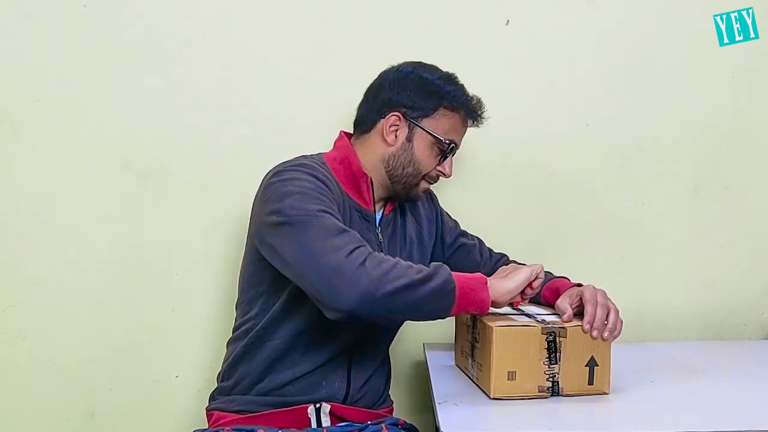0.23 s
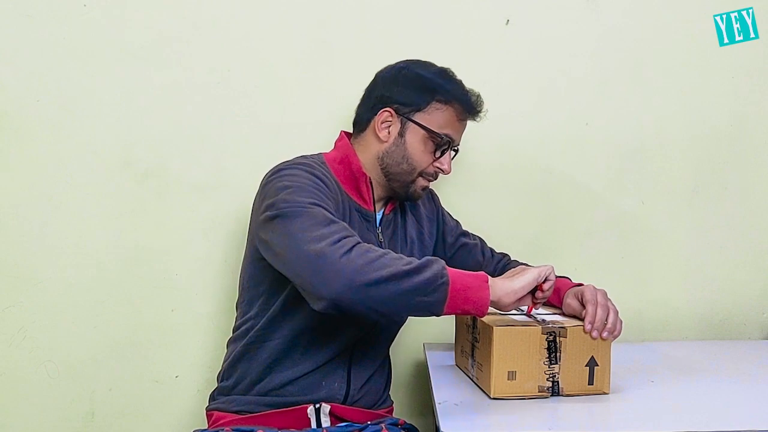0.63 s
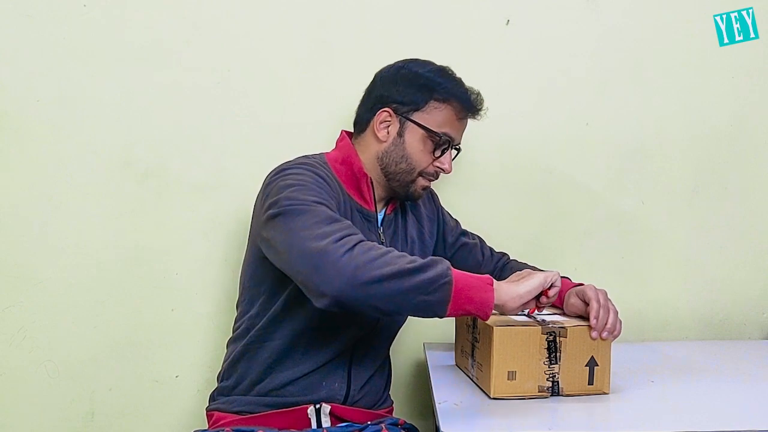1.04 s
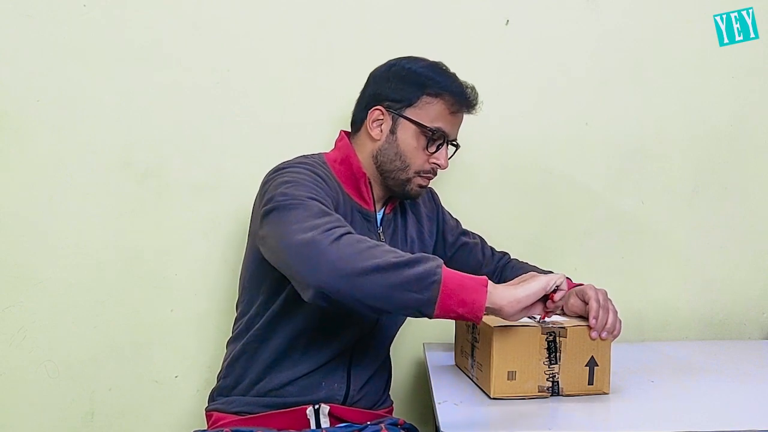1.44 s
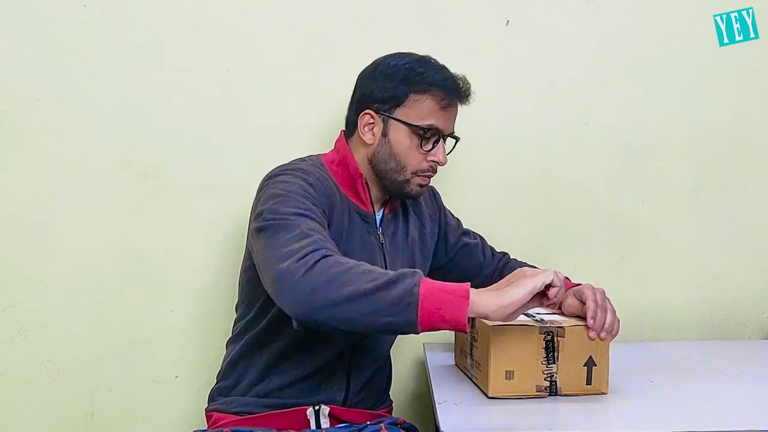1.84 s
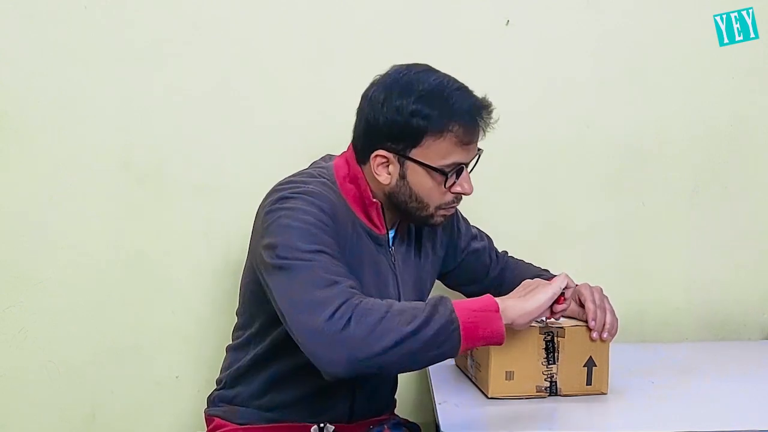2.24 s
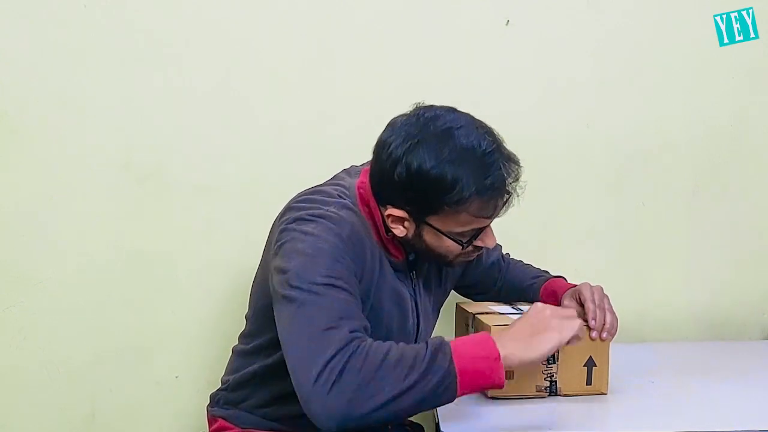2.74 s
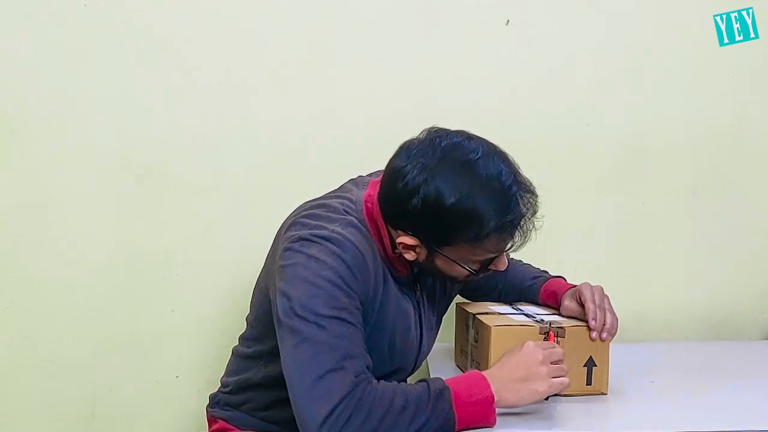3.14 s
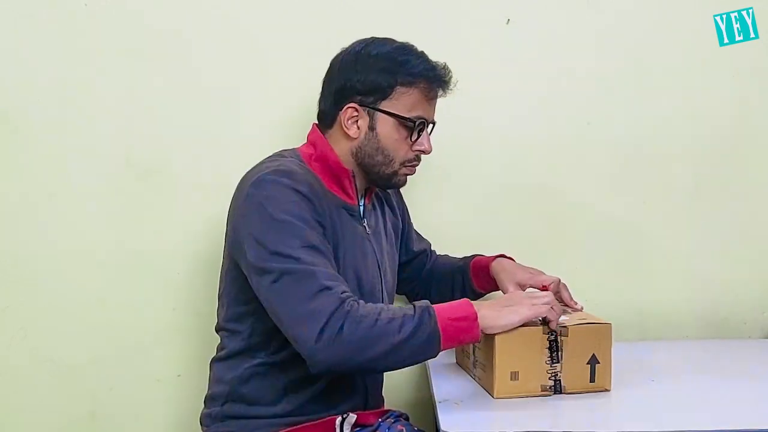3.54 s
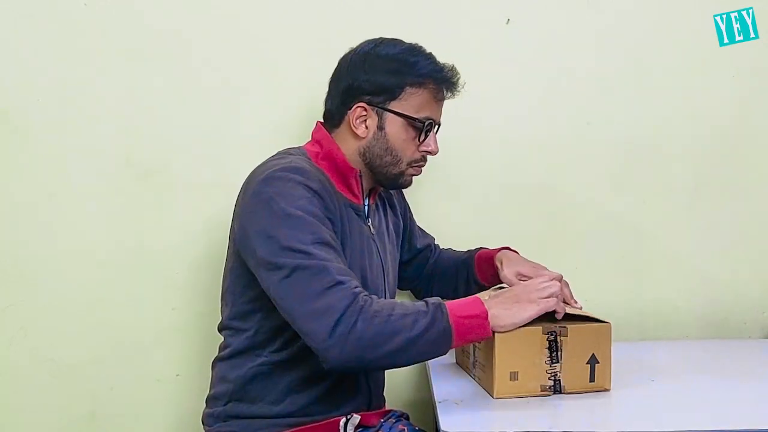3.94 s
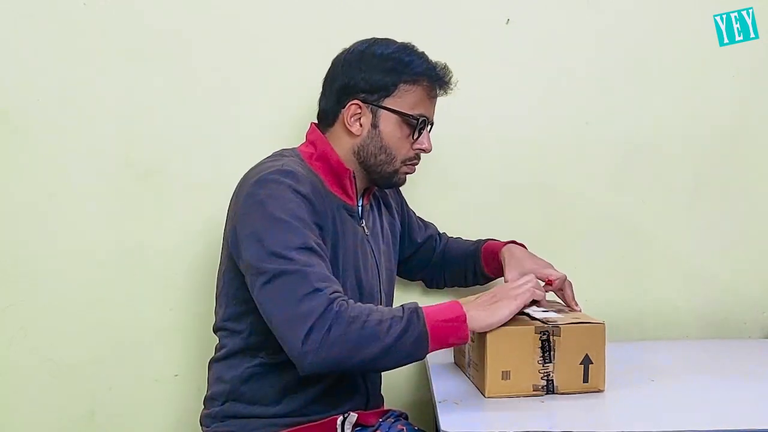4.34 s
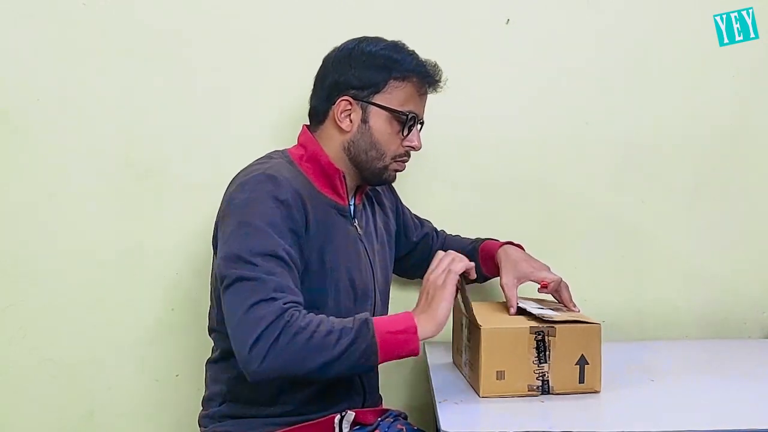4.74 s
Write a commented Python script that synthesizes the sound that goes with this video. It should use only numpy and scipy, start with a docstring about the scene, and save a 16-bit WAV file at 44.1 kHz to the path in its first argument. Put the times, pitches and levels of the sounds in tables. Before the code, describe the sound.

A knife slits packing tape on a cardboard box in gritty, hollow strokes, then hands tear the flaps loose with a booming rip.

```python
"""In a small bare room, a knife slits the tape on a cardboard box in a few strokes, then hands rip the flaps free.
Blade and tape stick and slip in dense tiny tears: random clicks ring the box (boom), the board (rasp)
and the tape film (fizz). Bigger catches are short noise bursts that snap and thump the box.
The steel rings faintly, the knife ticks once and the box shifts with soft low pushes.
Near surfaces and the room answer over a low room tone; one microphone."""
import sys
import numpy as np
from scipy import signal
from scipy.fft import rfft, irfft
from scipy.io import wavfile
from scipy.ndimage import uniform_filter1d

SR = 44100
rng = np.random.default_rng(int(sys.argv[2]) if len(sys.argv) > 2 else 0)


def dump(signal):
    """Clip the signal to [-1, 1] and save it as 16-bit WAV at the path in sys.argv[1]."""
    limited = np.clip(np.atleast_2d(signal).T, -1, 1)
    pcm = np.round(limited * 32767).astype(np.int16)
    wavfile.write(sys.argv[1], SR, pcm)


N = 220147
TIME = np.arange(N) / SR
EDGE_HZ = 15800  # upper band limit of the microphone


def amp(db):
    """Turns decibels into gain."""
    return 10 ** (np.asarray(db) / 20)


def evened(x):
    """Scales a sound to rms 1."""
    return x / np.sqrt(np.mean(x ** 2) + 1e-20)


def smoothed_twice(x, samples):
    """Takes a moving average, twice."""
    return uniform_filter1d(uniform_filter1d(x, samples), samples)


def steadied(x, samples):
    """Holds the rms near 1 over stretches of this many samples; finer grain stays."""
    power = smoothed_twice(x ** 2, samples)
    return x / np.sqrt(abs(power) + 1e-20)


def read(points, hz):
    """Reads a table between its points, on a log-frequency axis."""
    f, value = np.transpose(points)
    return np.interp(np.log(hz + 1), np.log(f + 1), value)


def add(mix, start_s, sound):
    """Mixes a sound in from a start time."""
    part = mix[max(round(start_s * SR), 0):][:len(sound)]
    part += sound[:len(part)]


def decay(t, t60):
    """Dies away by 60 dB in t60 seconds."""
    return np.exp(-np.log(1000) * t / t60)


def causal(gain, size=2048):
    """Turns a gain curve into a minimum-phase impulse response of unit energy."""
    cepstrum = irfft(np.log(np.maximum(gain / gain.max(), 1e-5)))
    # folding the cepstrum forward puts the energy as early as possible
    cepstrum[1:size] *= 2
    cepstrum[size + 1:] = 0
    taps = irfft(np.exp(rfft(cepstrum)))[:size]
    return taps / np.linalg.norm(taps)


def ring(modes, samples=12000):
    """Sums dying sines; neighbouring modes swing in opposite directions."""
    t = np.arange(samples) / SR
    total = np.zeros(samples)
    for k, (hz, db, t60) in enumerate(modes):
        total += (-1) ** k * amp(db) * decay(t, t60) * np.sin(2 * np.pi * hz * t)
    return total


# pushes of the knife, then pulls of the hands; levels before the trims in friction():
# start t/s, rise t/s, hold t/s, release t/s, box boom level/dB, board rasp level/dB, tape fizz level/dB
STROKES = [(-.05, 0.052, 0.16, 0.0333, -65, -69, -67.5), (0.127, 0.0329, .025, 0.1577, -29, -33, -43.5),
           (0.139, 0.2301, .06, .19, -26.5, -32.5, -41), (.42, 0.1186, 0.0541, 0.183, -24.5, -31, -38),
           (0.588, 0.051, .02, 0.097, -29.5, -52, -57.5), (0.848, 0.0743, 0.0192, 0.0864, -33.5, -43, -51),
           (.9, 0.075, 0.0198, .4, -58.5, -71, -89.5), (1.149, 0.1786, .04, 0.222, -23.5, -36.5, -42),
           (1.4, 0.0732, 0.3375, 0.0914, -34.5, -47.5, -50.5),
           (1.779, 0.0584, 0.0092, 0.1326, -22, -46.5, -42), (1.799, 0.069, .02, 0.2024, -29.5, -38, -33),
           (1.956, 0.068, 0.0255, 0.071, -67, -50.5, -53.5), (2.3, .028, 0.038, 0.173, -38.5, -49.5, -54.5),
           (2.412, 0.02324, 0.0188, 0.117, -22, -32, -47), (2.476, 0.0606, 0.0086, 0.2114, -30, -37.5, -45),
           (2.601, 0.064, 0.071, 0.0737, -44, -59.5, -56),
           (2.733, 0.01816, 0.00473, 0.0646, -26, -43.5, -59), (3.478, .13, .05, .14, -35, -61, -62.5),
           (3.621, 0.038, 0.194, 0.096, -38, -51.5, -51), (3.835, .022, .025, .19, -23, -32, -32),
           (3.922, 0.074, 0.0662, 0.1211, -42.5, -61, -58), (4.031, 0.037, 0.02195, .1, -19.5, -30, -36.5),
           (4.039, 0.0696, 0.0417, 0.192, -10, -26.5, -36), (4.203, 0.0688, 0.101, .1, -34, -52, -52.5),
           (4.376, 0.0248, 0.0972, 0.0943, -33.5, -48.5, -41),
           (4.493, 0.0276, 0.0053, 0.0886, -22.5, -34, -44.5),
           (4.542, 0.02405, 0.0095, 0.238, -22, -42, -42), (4.614, 0.055, 0.1724, 0.169, -40, -54.5, -56),
           (4.903, 0.0643, .03, 0.091, -28, -43.5, -48)]


def friction(boom_db=-3.5, rasp_db=-4.5, fizz_db=-4.5):
    """Each stroke sends its train of tears into the box, the board and the tape."""
    out = np.zeros(N)
    clicks, slip = tears()
    drag_db = drag()
    for start, rise, hold, release, *levels in STROKES:
        _, colour, blade, spread_db, spot_hz, spot_db = move_at(start + rise + hold / 2)
        near = (TIME > start - .1) & (TIME < start + rise + hold + 2 * release)
        t = TIME[near] - start
        train = clicks[near] * amp(spread_db * slip[near])
        effort = amp(effort_db(t, rise, hold, release) + drag_db[near])
        box_taps = ring(box_modes(spot_hz, spot_db), samples=7000)
        board_taps, tape_taps = contact(colour, blade)
        boom = flexed(signal.fftconvolve(train, box_taps))
        rasp = signal.fftconvolve(train, board_taps)
        fizz = signal.fftconvolve(train, tape_taps)
        for part, level_db, trim_db in zip((boom, rasp, fizz), levels, (boom_db, rasp_db, fizz_db)):
            out[near] += effort * amp(level_db + trim_db) * steadied(part[:len(t)], samples=1000)
    return out


def tears(per_s=4200, clump_db=1.5, clump_samples=150):
    """Stick and slip: clicks that bunch into clumps of a few milliseconds, and how far each one slips."""
    slip = np.minimum(rng.exponential(1, N), 5)
    clumps = amp(clump_db * evened(uniform_filter1d(rng.standard_normal(N), clump_samples)))
    signs = rng.choice([-1, 1], N)
    happens = rng.random(N) < per_s / SR
    return clumps * signs * happens, slip


def drag(uneven_db=1.11, samples=500):
    """Board and glue resist unevenly along the seam, so every stroke judders a little."""
    return uneven_db * evened(smoothed_twice(rng.standard_normal(N), samples))


STROKE_RANGE_DB = 33  # a stroke climbs this far in its rise and drops this far in its release


def effort_db(t, rise, hold, release):
    """The hand leans in, keeps its force and lets go."""
    still_to_rise = np.maximum(1 - t / rise, 0)
    let_go = np.maximum(t - rise - hold, 0) / release
    return -STROKE_RANGE_DB * (still_to_rise + let_go)


# colour of the contact in each move: f/Hz, level/dB (per Hz)
FIRST_CUT_COLOUR = [(330, -26), (560, 5), (874, -1), (964, -2), (1200, -4), (2100, -7), (2590, -15.5),
                    (2860, -14), (4040, -22.5), (4850, -12.5), (5340, -19), (6960, -15), (10600, -27),
                    (12800, -27), (15600, -34.5)]
TIP_SCRAPE_COLOUR = [(330, -38.5), (560, -5), (635, -7.5), (1020, -1), (1530, -0.5), (1680, -12.5),
                     (2070, 2), (2550, -18.5), (3770, -36), (4780, -25.5), (6860, -19), (7890, -24),
                     (10600, -19), (11200, -27.5), (15600, -44)]
LONG_CUT_COLOUR = [(330, -33), (560, 12.5), (600, 2.5), (951, -1.5), (1140, -4), (1370, -0.5), (1640, -7.5),
                   (2480, -10.5), (3830, -23), (4520, -15), (5650, -22.5), (6770, -15), (15600, -32)]
RUN_OUT_COLOUR = [(330, -38.5), (560, -5), (899, -9), (1190, -4.5), (1310, 1.5), (1550, -9), (1910, -1.5),
                  (2520, -5.5), (3830, -5.5), (4340, 0.5), (4980, -4.5), (6680, -2), (7670, -7),
                  (12700, -19), (15600, -28)]
EDGE_CUT_COLOUR = [(330, -31.5), (560, 10.5), (600, -6), (690, 0), (816, -5.5), (912, -1), (1080, -3.5),
                   (1370, -8), (1460, -4), (1750, -6.5), (2700, -19), (8460, -15.5), (11500, -27),
                   (13800, -26.5), (15600, -40)]
FIRST_PULL_COLOUR = [(330, -39), (560, -2), (653, -9), (912, 2.5), (1050, -8.5), (1460, -7.5), (1590, -2),
                     (1730, -10), (1910, -10), (2350, -13.5), (2550, -15.5), (4040, -21.5), (6310, -12.5),
                     (8340, -15), (15600, -33)]
HARD_PULL_COLOUR = [(330, -24.5), (560, 10.5), (690, -3), (816, 1), (1080, -7), (1270, -2), (1680, -7.5),
                    (2130, -6.5), (2320, -11.5), (3280, -21), (4160, -28.5), (7460, -24.5), (10600, -33.5),
                    (13600, -34), (15600, -39.5)]
PEEL_COLOUR = [(330, -24.5), (560, -5), (750, -6.5), (912, 10.5), (1090, 3.5), (1200, 5.5), (1350, 6.5),
               (1460, 7.5), (1830, -3.5), (2250, -7), (4040, -25), (7360, -19.5), (15600, -33.5)]
FLAP_SLIDE_COLOUR = [(330, -42), (560, 8), (937, -8.5), (1090, -15), (1240, -6), (1550, -22), (1680, -13),
                     (2190, -23.5), (2450, -30.5), (3190, -33), (4460, -27.5), (5270, -24), (6400, -15.5),
                     (8230, -12.5), (15600, -26.5)]
# moves of the knife and hands:
# start t/s, colour, share of blade ring, spread of tear sizes level/dB, favoured box pitch f/Hz, its boost level/dB
MOVES = [(0, FIRST_CUT_COLOUR, 0.33, 0.5, 201, -12), (.142, FIRST_CUT_COLOUR, 0.19, 2.5, 488.7, 6.5),
         (0.822, TIP_SCRAPE_COLOUR, 0.549, 2.5, 261.9, 9), (1.29, LONG_CUT_COLOUR, 0.485, 3, 160.6, 6),
         (1.83, RUN_OUT_COLOUR, 0.107, 2.5, 177.9, 12.5), (2.29, EDGE_CUT_COLOUR, 0.41, 2.5, 394, 5.5),
         (3.54, FIRST_PULL_COLOUR, 0.00929, 2.5, 260, 6.5), (4.041, HARD_PULL_COLOUR, 0.22, 3.5, 122.8, 9),
         (4.3, PEEL_COLOUR, 0.414, 2.5, 395.4, 4), (4.658, FLAP_SLIDE_COLOUR, 0.344, 4, 421.2, 26.5)]


def move_at(s):
    """Finds the move that is under way at time s."""
    return MOVES[sum(move[0] <= s for move in MOVES[1:])]


# resonances of the blade pressed in the seam: f/Hz, width f/Hz, level/dB (scaled by each move's blade share)
BLADE = [(2212, 410, 5.5), (4797, 600, 11), (6610, 280, 4.5), (10250, 880, -8)]


def contact(colour, blade, low_hz=560, split_hz=3200, size=4096):
    """One tiny tear as it sounds in the board (below the split) and in the tape (above it)."""
    hz = np.fft.rfftfreq(size, 1 / SR)
    blade_db = sum(db / (1 + (2 * (hz - f) / width) ** 2) for f, width, db in BLADE)
    bass_cut = 1 - 1 / (1 + (hz / low_hz) ** 6)
    gain = amp(read(colour, hz) + blade * blade_db) * bass_cut
    below = 1 / (1 + (hz / split_hz) ** 10)
    return causal(gain * np.sqrt(below)), causal(gain * np.sqrt(1 - below))


# panels and air of the box, before the boost of the spot: f/Hz, level/dB, 60 dB decay t/s
BOX = [(100, -25, 0.17), (128.3, -10.5, 0.086), (153.1, -6.5, 0.1406), (187.16, -4, 0.1704),
       (236.03, 4, 0.116), (272.36, 1, 0.0919), (345.84, -5, 0.159), (394.3, -5, 0.1782),
       (455.06, -6, 0.134), (480.1, -4.5, 0.0733), (576, -17, 0.07), (681.03, -18.5, 0.06),
       (800, -25, 0.024), (914.1, -17, 0.13)]


def box_modes(spot_hz, spot_db, width_hz=70):
    """The spot that is worked on drives some panel modes harder than others."""
    return [(hz, db + spot_db / (1 + (2 * (hz - spot_hz) / width_hz) ** 2), t60) for hz, db, t60 in BOX]


def flexed(x, depth=.055, samples=2600):
    """The hands bend the panels, so the pitch of the box wanders by a few percent."""
    bend = evened(smoothed_twice(rng.standard_normal(N), samples))[:len(x)]
    at = np.arange(len(x))
    return np.interp(at + np.cumsum(depth * bend), at, x)


# single catches that give way, levels before the trims in snaps():
# t/s, tape crack level/dB, board crack level/dB, box thump level/dB
SNAPS = [(.1376, -51.5, -46, -30), (.156, -39.5, -30.5, -22), (.5382, -46.5, -32, -19.5),
         (.5623, -38.5, -33.5, -18.5), (.7805, -61.5, -58, -62.5), (.8969, -60.5, -56, -38),
         (1.4676, -37, -34.5, -22), (1.5206, -38, -38, -22.5), (1.5763, -33.5, -33, -19),
         (1.6059, -37.5, -35.5, -28), (1.6534, -37.5, -38.5, -37), (1.6999, -42.5, -47, -29.5),
         (1.7591, -34.5, -36, -27), (1.8069, -32, -35.5, -21.5), (2.1675, -50.5, -61.5, -56.5),
         (2.3095, -64, -56.5, -44), (2.3242, -50.5, -47, -29.5), (2.4377, -36.5, -24.5, -14.5),
         (2.5228, -42, -28.5, -18.5), (2.7535, -40, -33.5, -20), (3.271, -69.5, -71.5, -41.5),
         (3.5403, -53.5, -47, -33.5), (3.8193, -45, -33, -20.5), (4.0577, -46, -34, -25.5),
         (4.3882, -41.5, -51, -47), (4.3988, -42.5, -35.5, -18.5), (4.5224, -40.5, -30.5, -23.5),
         (4.5641, -41.5, -30, -12.5), (4.815, -56, -52.5, -33.5), (4.9616, -51, -40.5, -30)]
SNAP_S = 0.002797  # time scale on which the burst of a catch dies after its peak


def snaps(catches, tape_db=0, board_db=-1, thump_db=-9, crest_s=0.00126, swell_s=0.00131,
          creep_db=-11, creep_s=0.0035, samples=2400):
    """A catch lets go in a run of tears that swells, peaks and dies; the box thumps."""
    lead_s = .02  # room for the fibres that give way before the catch
    out = np.zeros(N)
    t = np.arange(samples) / SR - lead_s - crest_s
    swell = np.exp(-(t / np.where(t < 0, swell_s, SNAP_S)) ** 2)
    creep = amp(creep_db) * np.exp(-abs(t) / creep_s)  # fibres give way just before and after
    for s, tape, board, box in catches:
        _, colour, blade, _, spot_hz, spot_db = move_at(s)
        run = tinted((swell + creep) * steadied(rng.standard_normal(samples), samples=60))
        board_taps, tape_taps = contact(colour, blade)
        crack = amp(board + board_db) * board_taps + amp(tape + tape_db) * tape_taps
        add(out, s - lead_s, signal.fftconvolve(run, crack))
        add(out, s, amp(box + thump_db) * thump(box_modes(spot_hz, spot_db)))
    return out


def tinted(run, tint_db=1.14, count=14):
    """No two catches tear alike: each has its own uneven colour."""
    hz = np.fft.rfftfreq(len(run), 1 / SR)
    points = np.column_stack([np.geomspace(600, 16000, count), tint_db * rng.standard_normal(count)])
    return irfft(rfft(run) * amp(read(points, hz)), len(run))


def thump(modes, rise_s=0.00412, damping_s=0.079, samples=4000):
    """The released panel swings back, its modes out of step; the hand on the lid shortens the ring."""
    t = np.arange(samples) / SR
    hz, db, t60 = np.transpose(modes)[:, :, None]
    phase = rng.uniform(0, 2 * np.pi, hz.shape)
    swing = (amp(db) * decay(t, t60) * np.sin(2 * np.pi * hz * t + phase)).sum(0)
    swing = swing * (1 - np.exp(-(t / rise_s) ** 2)) * np.exp(-t / damping_s)
    return swing / np.std(swing[:samples // 4])


# fast runs of catches, as the blade crosses the ribs of the board or the tape rips; levels at mid-run, before trims:
# start t/s, length t/s, gap t/s, tape level/dB, board level/dB, thump level/dB
RUNS = [(1.313, 0.1106, .0142, -33, -30, -15), (3.8541, 0.02364, .0108, -32, -26.5, -14.5),
        (4.0778, 0.065, .0172, -33, -18.5, -8)]
RUN_ARCH_DB, RUN_JITTER_S = 7.5, .0008  # how much weaker a run is at its ends; spread of its timing


def run_catches(count=16):
    """The catches of each run follow at a near-steady gap, strongest in the middle."""
    jitters = rng.standard_normal((len(RUNS), count))
    for (start, length, gap, *levels), jitter in zip(RUNS, jitters):
        for t, off in zip(np.arange(0, length, gap), jitter):
            arch_db = RUN_ARCH_DB * (2 * t / length - 1) ** 2
            yield start + t + RUN_JITTER_S * off, *(np.array(levels) - arch_db)


SNAGS_PER_S, SNAG_DB = 12, -3  # chance catches in a second of stroke; their level over the stroke, before trims


def snags(count=8):
    """Fibres and glue catch at random, as hard as the stroke is pushing."""
    all_draws = rng.random((len(STROKES), count, 2))
    for (start, rise, hold, release, boom, rasp, fizz), draws in zip(STROKES, all_draws):
        length = rise + hold + release / 2
        for place, chance in draws:
            if chance < SNAGS_PER_S * length / count:
                t = place * length
                push_db = SNAG_DB + effort_db(t, rise, hold, release)
                yield start + t, *(np.array([fizz, rasp, boom]) + push_db)


# free end of the knife, levels relative to each other: f/Hz, level/dB, 60 dB decay t/s
KNIFE = [(2092, -2, 0.68), (2146, -3.5, 0.67), (4650, -0.5, .3), (6690, -3.5, .4), (8370, -4, 0.295)]
KNIFE_DB, KNIFE_UNTIL_S = -63, 2.15  # gain of the ring; tearing after this time no longer drives it


def knife_ring(x):
    """During the long cuts the tearing sets the steel ringing."""
    driven = x * (TIME < KNIFE_UNTIL_S)
    return amp(KNIFE_DB) * signal.fftconvolve(driven, ring(KNIFE, samples=30000))[:N]


# one light tick of the knife, before its soft onset: f/Hz, level/dB, 60 dB decay t/s
TICK = [(3158, -38, 0.0175), (1700, -40.5, 0.0047), (510.5, -46, 0.0533)]
TICK_S = 3.0565  # when it ticks


def tick(rise_s=0.00138, samples=4000):
    """The knife ticks once, lightly, as it is set down by the box: a few short modes with a soft onset."""
    return ring(TICK, samples) * (1 - np.exp(-(TIME[:samples] / rise_s) ** 2))


# the box is pushed against the table, peaks before the microphone's bass cut: t/s, level/dB
BUMPS = [(0.138, -41), (3.541, -47), (4.139, -22)]


def bumps(width_s=0.0068):
    """The whole box shifts on the table: each time one soft, deep push of air."""
    return sum(amp(db) * np.exp(-((TIME - s) / width_s) ** 2) for s, db in BUMPS)


# table top and nearest walls: delay t/s, gain (before the sum is evened out)
ECHOES = [(.0011, 0.217), (.0027, 0.072), (.0052, 0.147), (.0094, 0.42), (0.013, 0.13)]


def reflected(x):
    """Near surfaces add early echoes that comb the spectrum."""
    out = x.copy()
    for delay_s, gain in ECHOES:
        add(out, delay_s, gain * x)
    return out / np.sqrt(1 + sum(gain ** 2 for _, gain in ECHOES))


# how long the room rings: f/Hz, 60 dB decay t/s
ROOM = [(120, 0.25), (320, 0.2586), (840, 0.36), (2200, 0.261), (5800, 0.2603), (14000, 0.31)]


def room(x, wet_db=-5, gap_s=0.0029, soft_hz=10500):
    """Close walls return sparse, slightly dull reflections, each band dying at its own speed."""
    signs = rng.choice([-1., 1.], SR)
    taps = signs * (rng.random(SR) < 4000 / SR) * (TIME[:SR] > gap_s)
    hz, t, bands = signal.stft(taps, SR, nperseg=256)
    tail = signal.istft(bands * decay(t, read(ROOM, hz)[:, None]), SR)[1]
    # many overlapping room modes: no narrow band stands out
    bins = rfft(tail)
    nearby_power = abs(uniform_filter1d(abs(bins) ** 2, size=45))
    tail = irfft(bins / np.sqrt(nearby_power + 1e-20))[:SR * 3 // 4]
    tail = signal.lfilter(*signal.butter(1, soft_hz, fs=SR), tail / np.linalg.norm(tail))
    return amp(wet_db) * signal.fftconvolve(x, tail)[:N]


# colour of the room tone, relative: f/Hz, level/dB (per Hz)
FLOOR = [(25, -36.5), (50, -19), (90, 1), (200, 1), (400, -9), (700, -17.5), (2000, -28), (7000, -32),
         (15000, -41.5)]
FLOOR_DB = -66.5  # rms level before the microphone


def floor():
    """Faint low room tone: noise shaped by its colour table."""
    colour = amp(read(FLOOR, np.fft.rfftfreq(N, 1 / SR)))
    return amp(FLOOR_DB) * evened(irfft(rfft(rng.standard_normal(N)) * colour, N))


def scene(cut_hz=60):
    """Adds up the work on the box, its echoes and the room tone."""
    tearing = friction() + snaps([*SNAPS, *run_catches(), *snags()])
    # little deep bass below 60 Hz comes from the work
    bass_cut = signal.butter(2, cut_hz, "high", fs=SR, output="sos")
    work = signal.sosfilt(bass_cut, tearing + knife_ring(tearing))
    click = np.zeros(N)
    add(click, TICK_S, tick())
    answer = room(work + 0.51 * click)  # the tick excites the room less
    return (reflected(work) + click + bumps() + answer + floor())[None]


def record(dry, bass_hz=70):
    """The microphone sheds deep bass; then a steep filter limits the treble."""
    thin = signal.sosfilt(signal.butter(3, bass_hz, "high", fs=SR, output="sos"), dry)
    band_limit = signal.firwin(511, EDGE_HZ, window=("kaiser", 9), fs=SR)
    return signal.oaconvolve(thin, band_limit[None], "same")


dry = scene()
out = record(dry)
dump(out)
```